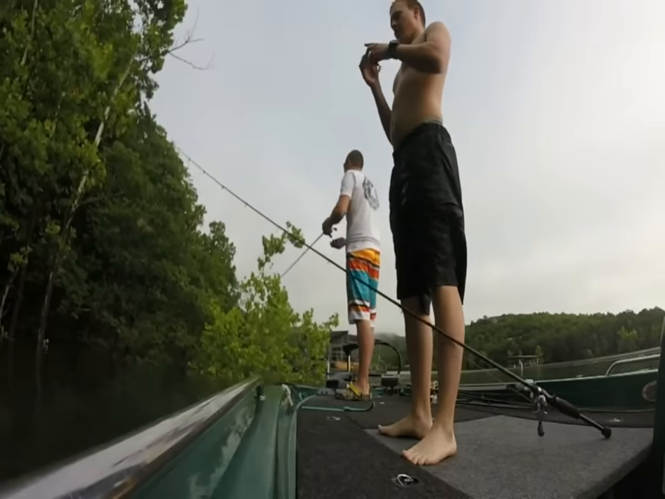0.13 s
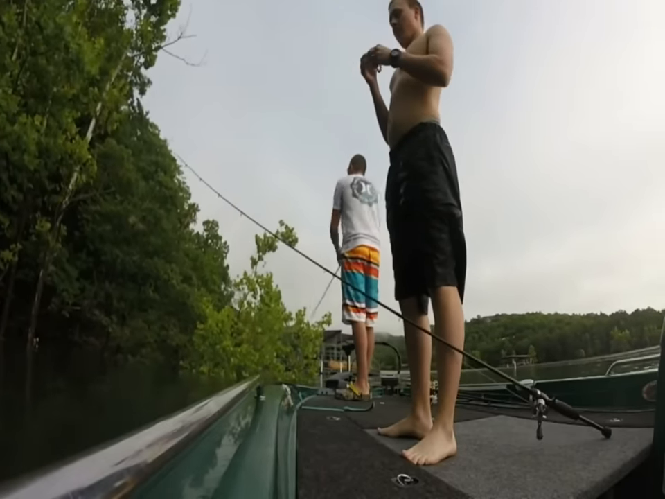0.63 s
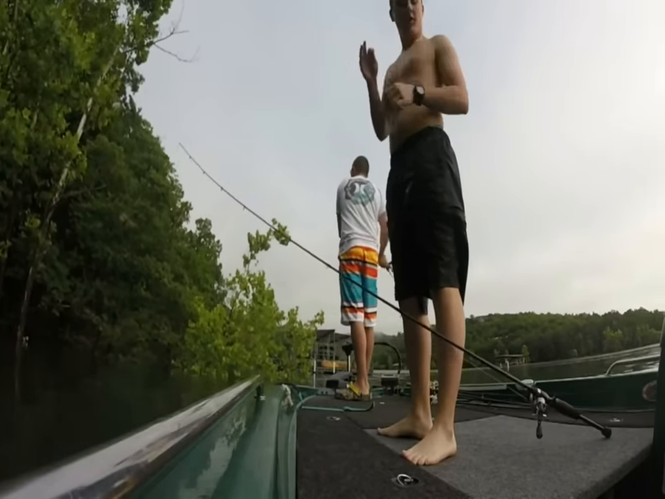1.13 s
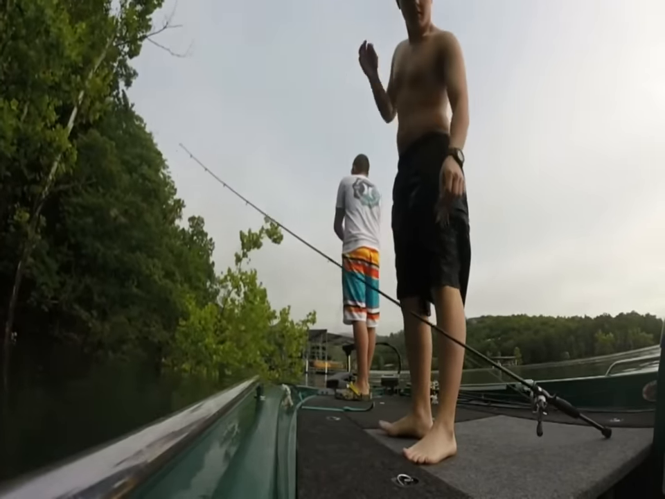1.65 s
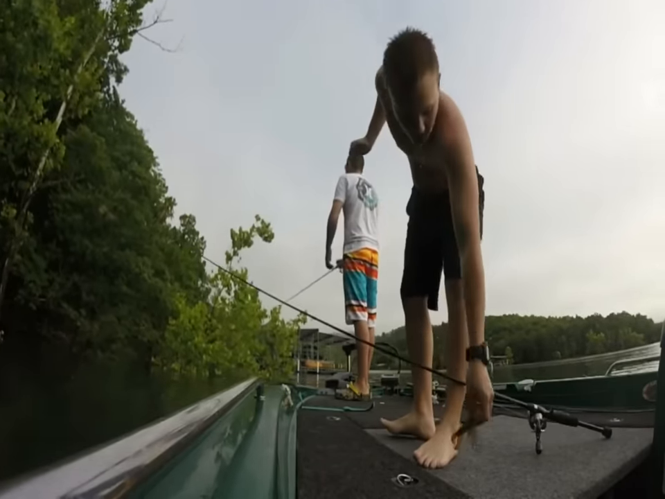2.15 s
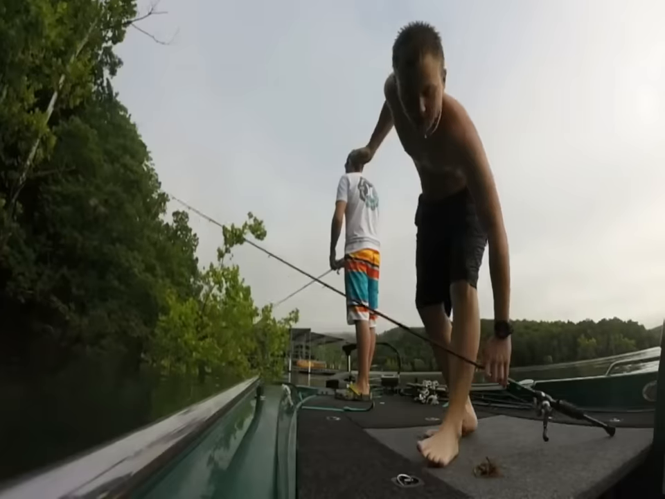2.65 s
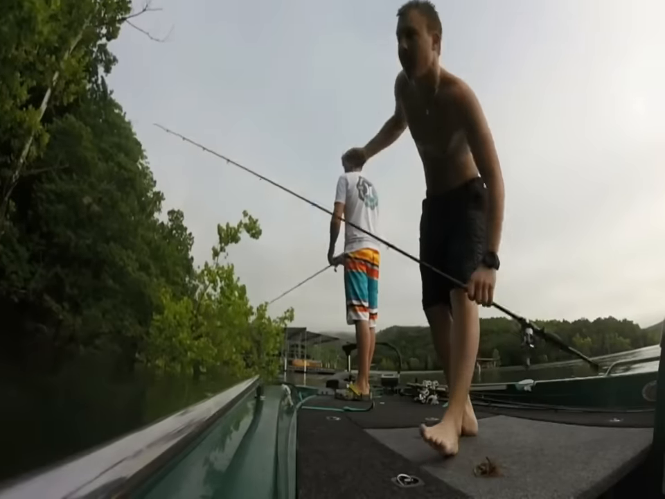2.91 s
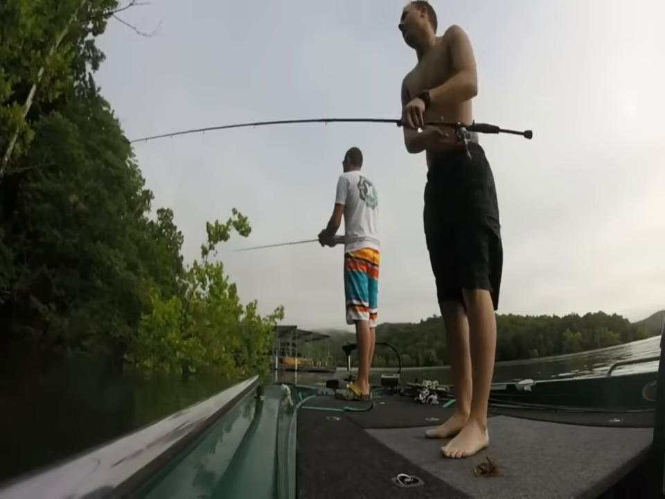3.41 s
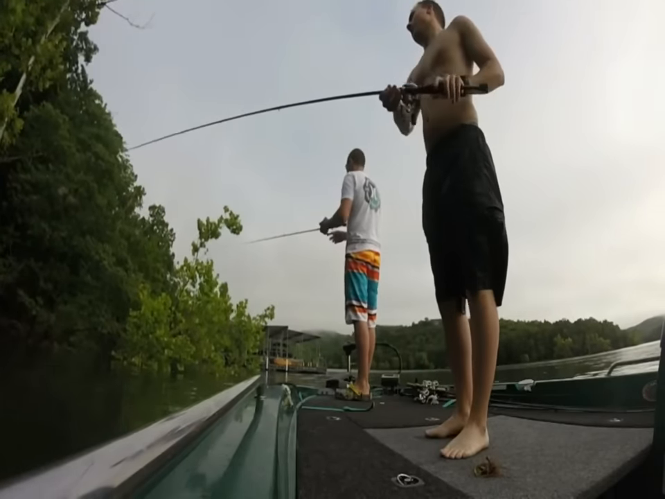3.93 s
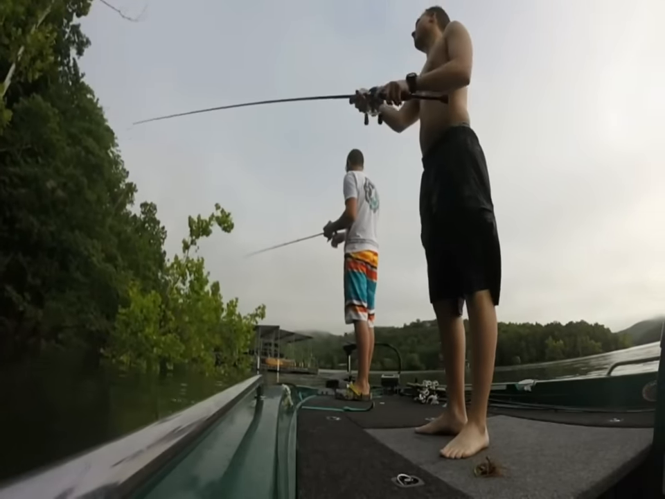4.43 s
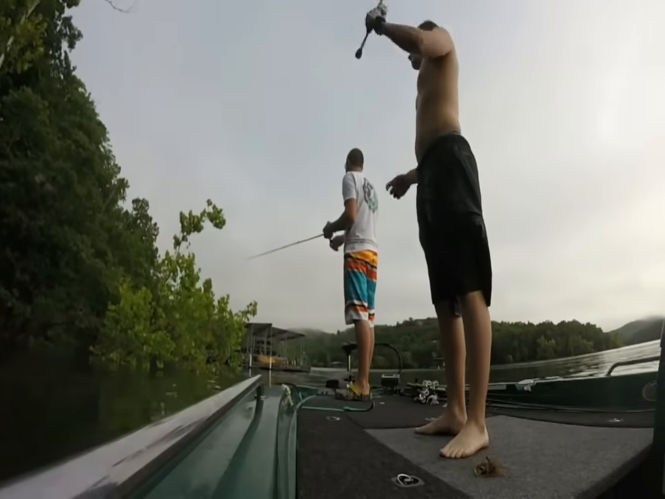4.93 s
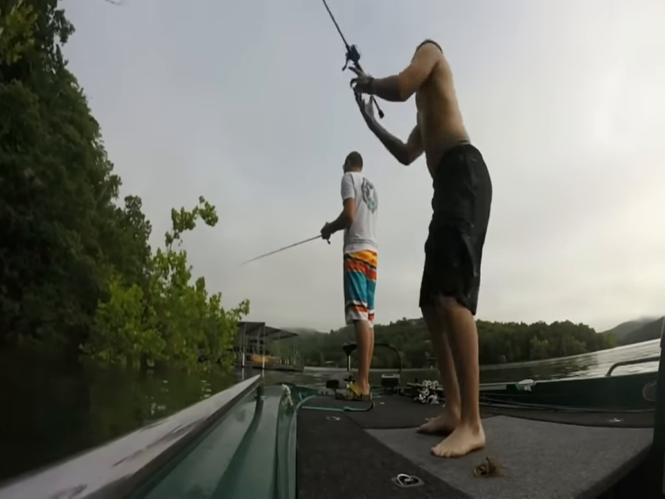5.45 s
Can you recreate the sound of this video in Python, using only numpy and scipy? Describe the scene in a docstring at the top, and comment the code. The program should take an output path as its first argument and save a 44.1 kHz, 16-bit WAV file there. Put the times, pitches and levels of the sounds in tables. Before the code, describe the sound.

Deep, wavering pump hum and soft water-and-air hiss continue throughout. Feet bump the hollow deck loudly at the start, a line squeaks once before the first second ends, a quiet gap follows, then small knocks and rod ticks, six fast reel clicks, and a closing rattle and boomy thump. Outdoors, close, dry, single-channel sound, microphone on the boat.

```python
"""Deck of a small boat, close by: feet and tackle knock the hull, rods and reels tick and scrape,
a line squeals once as it is pulled. Two small pumps hum through the hull and beat; water and air hiss softly.
Pumps are sines on running cycle counts; knocks are decaying hull modes; ticks are noise bursts through the
tackle's resonances; the squeal is stick-slip harmonics with rubbing noise; hiss and rustle are shaped noise."""
import sys
import numpy as np
from scipy import signal
from scipy.fft import rfft, irfft, next_fast_len
from scipy.io import wavfile
from scipy.ndimage import uniform_filter1d, map_coordinates

SR = 44100
rng = np.random.default_rng(int(sys.argv[2]) if len(sys.argv) > 2 else 0)


def level_to_linear(level):
    """Convert decibel levels to linear amplitude factors, elementwise."""
    exponent = np.asarray(level, float) / 20
    return 10 ** exponent


def bounce(signal):
    """Save signal as a 16-bit WAV file at the path given by the first command-line argument."""
    frames = np.transpose(np.atleast_2d(signal))
    limited = np.clip(frames, -1, 1)
    pcm = np.round(limited * 32767).astype(np.int16)
    wavfile.write(sys.argv[1], SR, pcm)


N = 245637

# pump hum in the hull: (time [s], shaft tone level [dB], beating pair level [dB])
HUM = [(0, -34.5, -37.5), (.5, -43, -45), (.9, -54, -52), (1.2, -47.5, -43), (1.45, -48, -42.5),
       (1.8, -51, -45.5), (2.1, -48.5, -44.5), (2.6, -39.5, -45.5), (3.0, -53, -43.5), (3.2, -42, -40.5),
       (3.4, -47, -34.5), (3.65, -54.5, -44.5), (4.2, -39.5, -41.5), (4.6, -48.5, -47), (4.8, -40.5, -41),
       (5.0, -48, -45.5), (5.25, -42, -48), (5.57, -46, -32)]
# first pump's speed: (time [s], rate [turns/s])
SHAFT_RATE = [(0, 64.2), (1, 64.2), (2.3, 64.35), (2.5, 64.8), (3.6, 64.7), (5.57, 64.6)]
# second pump's lag at twice shaft rate, pair weakest at each half cycle: (time [s], lag [cycles])
PUMP_LAG = [(-.2, .5), (.67, 3.5), (1.42, 5.5), (2.32, 8.5), (3.03, 11.5), (3.44, 12.5), (3.66, 13.5),
            (4.07, 14.5), (5.85, 19.5)]
# pair of tones near 250 Hz: (time [s], level [dB])
UPPER_PAIR = [(0, -57), (1.4, -59), (2.3, -60), (2.45, -53), (3.0, -48.5), (3.7, -53.5), (4.0, -49.5),
              (4.7, -56), (5.1, -51), (5.57, -57.5)]
# water and air hiss, relative spectrum: (frequency [Hz], density [dB per Hz])
HISS_SPECTRUM = [(15, -46), (30, -10.5), (60, -7.5), (100, -4.5), (140, -9), (200, -14), (260, -13),
                 (330, -16.5), (480, -17.5), (620, -21), (1500, -30.5), (3050, -34.5), (7000, -42),
                 (10000, -49), (12200, -50), (15000, -56.5)]
# rustle of cloth, line and feet: (time [s], half length [s], level [dB])
RUSTLES = [(.2, 0.076, -63), (.95, .25, -61), (2.5, .06, -69), (2.9, .1, -65), (3.16, 0.06, -67.5),
           (4.2, 0.06, -64), (4.85, .06, -67), (5.12, .1, -69), (5.45, 0.057, -65.5), (5.55, 0.022, -51.5)]
# faint steady whines: (frequency [Hz], rms level [dB])
WHINES = [(8032, -97), (12048, -93), (14024, -101), (14088, -99)]
# hull modes by part of the boat: (frequency [Hz], level [dB], t60 [s], swell time [s])
HULL_MODES = {"sway": [(36.8, 4.5, 0.23, 0.017), (48.5, -8, 0.17, 0.017), (64.55, -1.5, 0.78, 0.011)],
              "hull": [(68.3, 0.5, 2.05, 0.035)], "floor": [(118.4, 4, 0.35, 0.0058)],
              "panel": [(146.5, 2, .15, 0.0026), (185.7, 1.5, 0.32, 0.01), (243.6, -2, 0.27, 0.0036)],
              "lid": [(462.3, -3, 0.099, 0.0051), (539, 11.5, 0.047, 0.0074)],
              "rim": [(283.5, 2.5, 0.14, 0.0025), (389.6, -9, 0.16, 0.0023), (689, 4.5, 0.031, 0.0016),
              (891, -6.5, 0.047, 0.0067)]}
# parts rung by a blow on each spot: (floor [dB], panel [dB], lid [dB], rim [dB])
SPOT_SHARES = {"floor": (-1, -10, -31, -30), "panel": (-6, 1, -17, -16), "lid": (-4.5, -19, 1.5, -10.5),
               "rim": (-20, -8.5, 2, 2.5)}
# knocks: (time [s], level [dB], spot struck)
KNOCKS = [(.127, -14.5, "floor"), (.132, -28, "lid"), (.183, -41, "rim"), (0.193, -27, "lid"),
          (.196, -17, "floor"), (2.376, -42, "rim"), (2.384, -32, "rim"), (2.406, -29.5, "panel"),
          (2.436, -34.5, "panel"), (2.467, -46, "rim"), (2.499, -37.5, "panel"), (2.835, -48.5, "rim"),
          (2.895, -47.5, "rim"), (3.098, -52, "rim"), (3.925, -36.5, "lid"), (4.884, -40.5, "lid"),
          (5.015, -49, "rim"), (5.468, -41, "lid"), (5.509, -32.5, "floor"), (5.525, -37, "panel")]
# weight landing on the deck, moving the whole boat: (time [s], sway level [dB], hull level [dB])
LURCHES = [(.127, -39, -35), (0.194, -36.5, -16.5), (2.408, -52, -40), (2.494, -33.5, -58),
           (2.748, -47, -62), (4.351, -32.5, -53), (5.51, -20, -15.5)]
# rod, reel and lure contacts: (time [s], level [dB], brightness [octaves over 1 kHz])
TICKS = [(0.128, -43.5, 1.17), (0.135, -43, -1), (0.185, -43.5, 0.2), (0.199, -41.5, 0.24),
         (.206, -40, 0.16), (0.452, -53, 1.6), (0.77, -43.5, -0.4), (0.801, -39.5, 0), (.922, -45, 0.7),
         (1.378, -45.5, 0.84), (2.256, -50, -0.2), (2.388, -46, -.3), (2.472, -43.5, 0.94),
         (2.841, -47, 0.83), (2.894, -48, 0.8), (3.101, -48, 1), (3.138, -49, 0.6), (3.209, -56, 1),
         (3.932, -42, -0.9), (4.746, -43, 2.5), (4.753, -44.5, 1), (4.846, -44, 1.7), (4.89, -45, 1.14),
         (5.022, -46.5, 1.03), (5.059, -51, 0.3), (5.099, -51, 0.3), (5.131, -43.5, 3), (5.284, -50, 1.8),
         (5.379, -51, 2), (5.404, -44, 2.5), (5.426, -41, 1.07), (5.461, -48, 0.9), (5.474, -34, 1.1),
         (5.494, -53, 2), (5.516, -44.5, 1.5), (5.527, -46.5, 1.8), (5.539, -38.5, 0.47), (5.55, -35, 0),
         (5.556, -47, 0)]
# tackle resonances: (frequency [Hz], width [Hz], gain [dB])
TACKLE = [(837, 450, 12), (1510, 460, 17.5), (1906, 1020, 11.5), (2720, 420, 12.5), (3800, 570, 3.5),
          (5110, 600, 5.5), (6880, 390, 2), (7600, 410, 5), (8500, 1550, -2), (11250, 1100, -2.5),
          (14000, 1500, -10.5)]
# pulled line: (time [s], slip rate [slips/s], 1st harmonic level [dB], 2nd harmonic level [dB])
SQUEAL = [(.76, 300, -68, -72), (.79, 420, -48, -79), (.826, 455, -47, -57), (.85, 480, -42.5, -54),
          (.87, 486, -42.5, -60), (.893, 490, -42, -61), (.908, 485, -38.5, -56), (.922, 470, -39, -51),
          (.938, 457, -47.5, -45.5), (.958, 404, -44.5, -63), (1.0, 370, -68, -83)]
# squeal overtones: (multiple of slip rate, level re 3rd harmonic [dB])
OVERTONES = [(4, -27), (5, -17), (6, -24), (7, -16), (8, -24), (9, -33)]
# rubbing around the squeal: (time [s], half length [s], rub level [dB], hiss level [dB])
RUBS = [(0.798, 0.029, -52.5, -72), (0.836, 0.016, -55, -58.5), (0.876, 0.035, -67, -65.5),
        (0.904, .012, -63, -62), (0.923, 0.012, -54.5, -72)]


def unit(x):
    """Scales to rms 1."""
    return x / np.sqrt(np.mean(x ** 2) + 1e-20)


def curves(rows):
    """One value per sample for each column after the time."""
    s, *cols = np.transpose(rows)
    return [np.interp(np.arange(N) / SR, s, c) for c in cols]


def wobble(knots_per_s):
    """Smooth random curve."""
    knots = rng.standard_normal(int(N * knots_per_s / SR) + 4)
    return map_coordinates(knots, [np.arange(N) * knots_per_s / SR])


def filtered(x, response):
    """x times a complex response of frequency."""
    m = next_fast_len(len(x) + 8192)
    return irfft(rfft(x, m) * response(np.fft.rfftfreq(m, 1 / SR)), m)[:len(x)]


def resonances(modes):
    """Causal response of (frequency [Hz], width [Hz], gain [dB]) resonances, alternating in sign."""
    def response(f):
        total = 0
        for k, (hz, width_hz, db) in enumerate(modes):
            damping = 1j * f * width_hz
            total = total + (-1) ** k * level_to_linear(db) * damping / (hz * hz - f * f + damping)
        return total
    return response


def band(lo_hz, hi_hz):
    """Noise of rms 1 between two soft edges."""
    edge = lambda f: 1 / np.sqrt((1 + (lo_hz / (f + 1)) ** 4) * (1 + (f / hi_hz) ** 4))
    return unit(filtered(rng.standard_normal(N), edge))


def tone(cycles, waver_db=0):
    """Sine on a running cycle count, rms 1 before its level wavers."""
    return np.sqrt(2) * level_to_linear(waver_db * wobble(6.7)) * np.sin(2 * np.pi * (cycles + rng.random()))


def swells(rows):
    """Bell-shaped gains from (time [s], half length [s], level [dB]) rows, added as powers."""
    t = np.arange(N) / SR
    return np.sqrt(sum(level_to_linear(db) ** 2 * np.exp(-((t - s) / half_s) ** 2) for s, half_s, db in rows))


def pumps():
    """Orders of the first pump; the second, a little slower, beats against them."""
    shaft_db, pair_db = curves(HUM)
    t = np.arange(N) / SR
    turns = np.cumsum(curves(SHAFT_RATE)[0]) / SR
    lag, = curves(PUMP_LAG)
    twice = 2 * turns + rng.random()
    pair = np.sin(2 * np.pi * (twice - lag)) + 0.7 * np.sin(2 * np.pi * twice)
    other_half = (2 * turns - lag) / 4  # cycles at half the second pump's rate
    shaft = tone(turns, waver_db=-2.5) + 0.78 * tone(2 * other_half, waver_db=-3.5)
    shaft = unit(shaft + 0.22 * band(52, 93))
    upper = unit(tone(4 * turns) + tone(248.4 * t))
    sixth = tone(6 * turns, waver_db=2.5)
    three_halves = tone(3 * other_half, waver_db=3)
    eighth = tone(8 * turns, waver_db=3.5)
    whirr = unit(filtered(rng.standard_normal(N), resonances([(465.6, 12.4, 0)])))
    upper_db = curves(UPPER_PAIR)[0] + 1.45 * wobble(8.6)
    whirr_db = -63.5 + 1.2 * t + 3.4 * wobble(4.5)  # grows 1.2 dB/s
    low = level_to_linear(shaft_db) * shaft + level_to_linear(-54) * three_halves + level_to_linear(pair_db) * unit(pair)
    high = level_to_linear(upper_db) * upper + level_to_linear(-68) * sixth + level_to_linear(-63) * eighth
    return low + high + level_to_linear(whirr_db) * whirr


def surroundings():
    """Patchy hiss of water and air, grainy rustle on deck, faint steady whines."""
    z = signal.stft(rng.standard_normal(N), nperseg=512)[2]
    field = uniform_filter1d(rng.standard_normal(z.shape), size=6, axis=0)
    field = uniform_filter1d(field, size=10, axis=1)
    patchy = signal.istft(z * level_to_linear(0.96 * unit(field)), nperseg=512)[1][:N]
    hz, db = np.transpose(HISS_SPECTRUM)
    hiss = unit(filtered(patchy, lambda f: level_to_linear(np.interp(np.log(f + 1), np.log(hz), db))))
    grain_db = 1.6 * wobble(40) + 0.7 * wobble(300)
    rustle_gain = np.hypot(level_to_linear(-65), swells(RUSTLES))  # steady bed plus events
    rustle = rustle_gain * unit(band(380, 2330) * level_to_linear(grain_db))
    whine = sum(level_to_linear(db) * tone(f * np.arange(N) / SR, waver_db=1.5) for f, db in WHINES)
    return level_to_linear(-52 + 0.44 * wobble(3.52)) * hiss + rustle + whine


def knocks():
    """Blows ring the boat's modes; bending waves bring low modes later, each mode swells at its own pace."""
    out, t = np.zeros(N + 2 * SR), np.arange(3 * SR // 2) / SR
    blows = []
    for s, db, spot in KNOCKS:
        blows += [(s, part, db + share_db) for part, share_db in zip(SPOT_SHARES, SPOT_SHARES[spot])]
    for s, sway_db, hull_db in LURCHES:
        blows += [(s, "sway", sway_db), (s, "hull", hull_db)]
    for s, part, part_db in blows:
        for hz, db, t60_s, swell_s in HULL_MODES[part]:
            decay = level_to_linear(part_db + db + rng.normal(0, 1.2) - 60 * t / t60_s)
            ring = decay * np.sin(2 * np.pi * hz * t) * (1 - np.exp(-t / swell_s)) ** 2
            arrival_s = s + 0.15 / np.sqrt(hz)
            out[round(arrival_s * SR):][:len(t)] += ring
    return out[:N]


def tick_colour(ring, db, bright):
    """Tackle response tilted to a peak at the brightness; bright contacts reach further up."""
    below, above = 5.5, 7.5 / (1 + 0.27 * max(bright, 0) ** 2)  # loss [dB per squared octave]

    def colour(f):
        octaves = np.log2((f + 1) / 1000) - bright
        loss_db = np.where(octaves < 0, below, above) * octaves ** 2
        return ring(f) * level_to_linear(db - np.minimum(loss_db, 50))
    return colour


def ticks():
    """Each contact is a dying rattle through the tackle's resonances; hard, bright ones start with a crack."""
    out, t = np.zeros(N + SR), np.arange(SR // 8) / SR
    ring = resonances(TACKLE)
    # six clicks of the reel
    ratchet = [(4.115 + k * 0.0225 + rng.normal(0, 0.0019), -48.5 + rng.normal(0, 1.3), 0.78)
               for k in range(6)]
    for s, db, bright in TICKS + ratchet:
        colour = tick_colour(ring, db, bright)
        t60_s = max(0.059 * (1 - 0.14 * bright), 0.005)
        hard = np.clip((bright - 1.6) / 0.57, 0, 1)
        crack = 3.2 * hard * level_to_linear(-60 * t / 0.0053)
        shape = level_to_linear(-60 * t / t60_s) * (1 - np.exp(-t / 0.0016)) + crack
        rattle = filtered(shape * rng.standard_normal(len(t)), colour)
        # scale the random burst to its expected energy
        colour_rms = np.sqrt(np.mean(abs(colour(np.linspace(0, SR / 2, len(t)))) ** 2))
        expected = np.linalg.norm(shape) * colour_rms
        out[round(s * SR):][:len(t)] += rattle * expected / np.linalg.norm(rattle)
    return out[:N]


def squeal():
    """Stick-slip of the line: a tone rich in odd multiples, with rubbing noise and hiss."""
    rate, first_db, second_db = curves(SQUEAL)
    # the 3rd nears the 1st as the rate nears taut, 489 slips/s
    third_db = first_db + np.maximum(-0.5 - 0.6 * abs(489 - rate), -18)
    t = np.arange(N) / SR
    slips = np.cumsum(rate * (1 + 0.009 * wobble(150))) / SR
    sound = level_to_linear(first_db) * tone(slips)
    sound += level_to_linear(second_db + 2.6 * wobble(58.6)) * tone(2 * slips)
    sound += level_to_linear(third_db + 1.3 * wobble(59.34)) * tone(3 * slips)
    for k, db in OVERTONES:
        sound += level_to_linear(third_db + db + 3 * wobble(30)) * tone(k * slips)
    sound *= (t > SQUEAL[0][0]) & (t < SQUEAL[-1][0])
    rough = rng.standard_normal(N) * level_to_linear(2.5 * wobble(90.15))
    rub = unit(filtered(rough, resonances(TACKLE[:5])))
    hiss_modes = [(3200, 1700, -2), (7000, 1800, -2), (10500, 3000, -16)]
    hiss = filtered(rng.standard_normal(N), resonances(hiss_modes))
    hiss = unit(level_to_linear(1.8 * wobble(60.9)) * hiss)
    s, half_s, rub_db, hiss_db = np.transpose(RUBS)
    return sound + swells(zip(s, half_s, rub_db)) * rub + swells(zip(s, half_s, hiss_db)) * hiss


def scene():
    """All sources summed to one channel."""
    return (pumps() + surroundings() + knocks() + ticks() + squeal())[None]


def top_cut(x):
    """Nothing passes above the cut-off."""
    return signal.sosfilt(signal.butter(12, 14910, fs=SR, output="sos"), x)


def record(dry):
    """Finishes the mix."""
    return top_cut(dry)


dry = scene()
out = record(dry)
bounce(out)
```